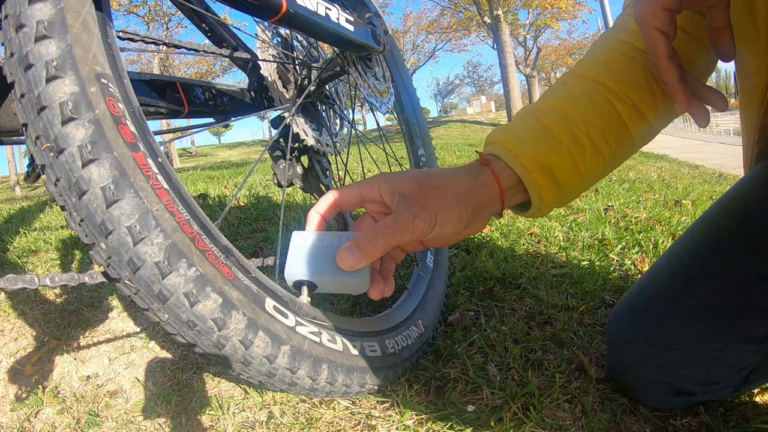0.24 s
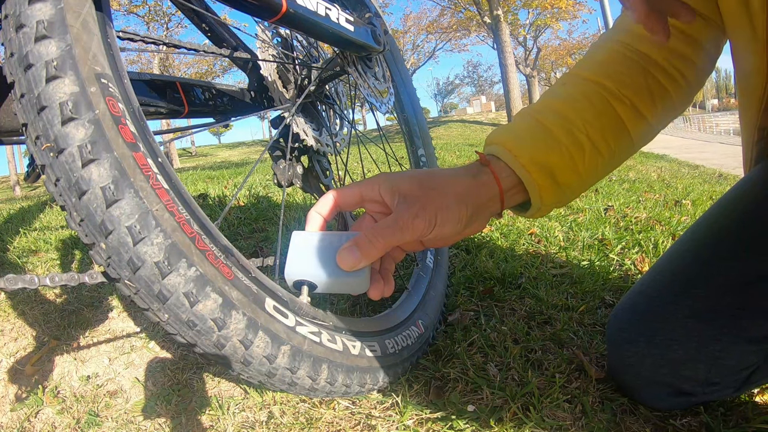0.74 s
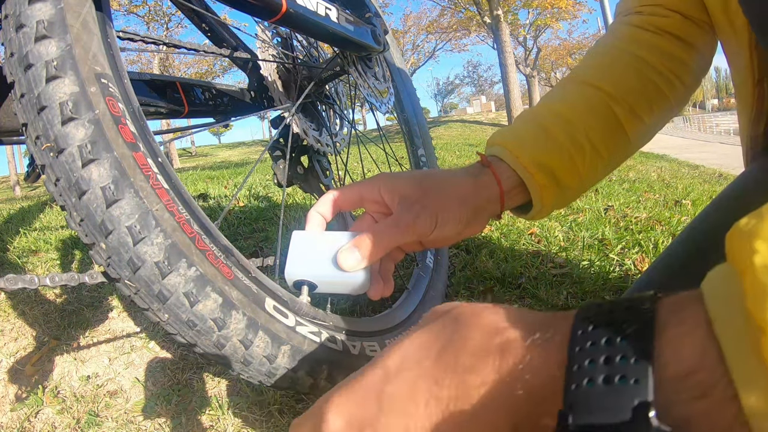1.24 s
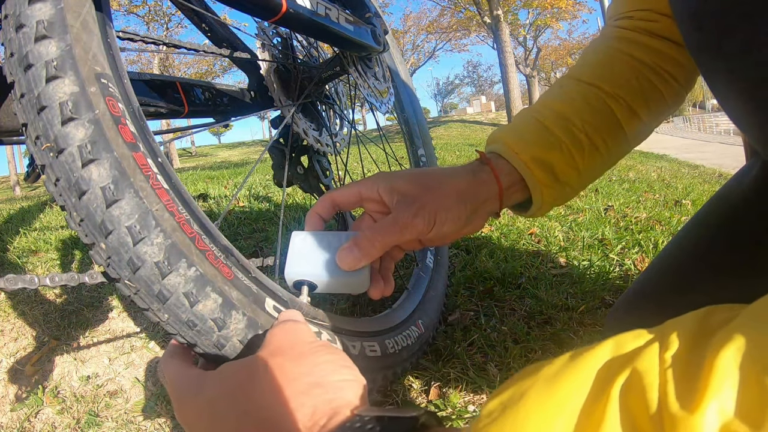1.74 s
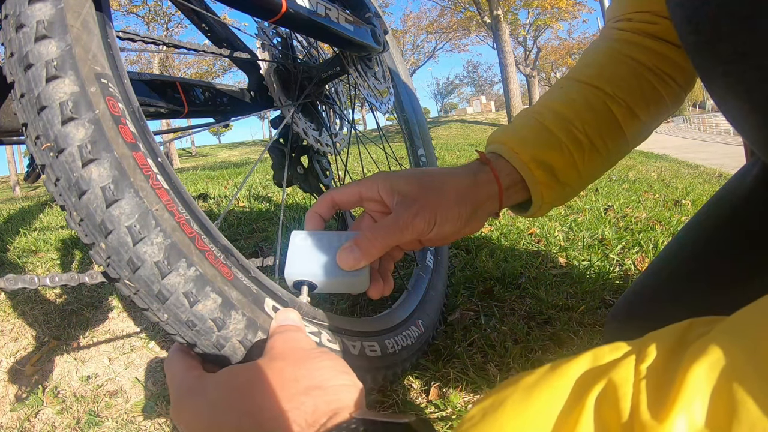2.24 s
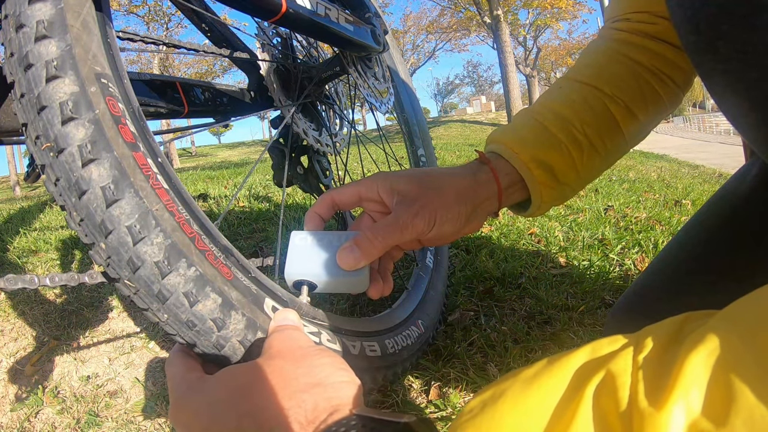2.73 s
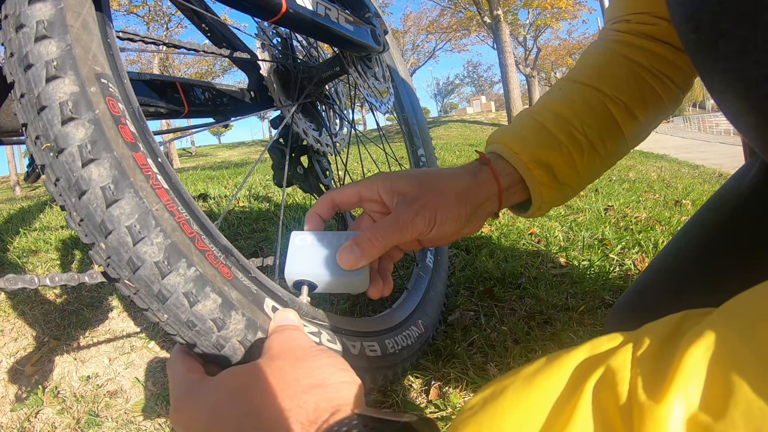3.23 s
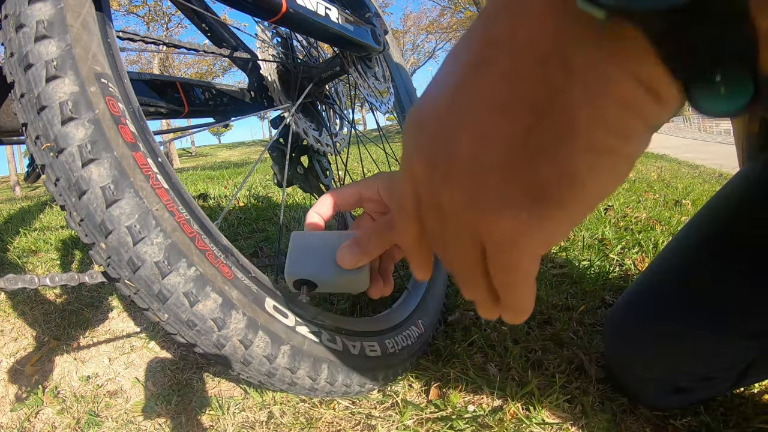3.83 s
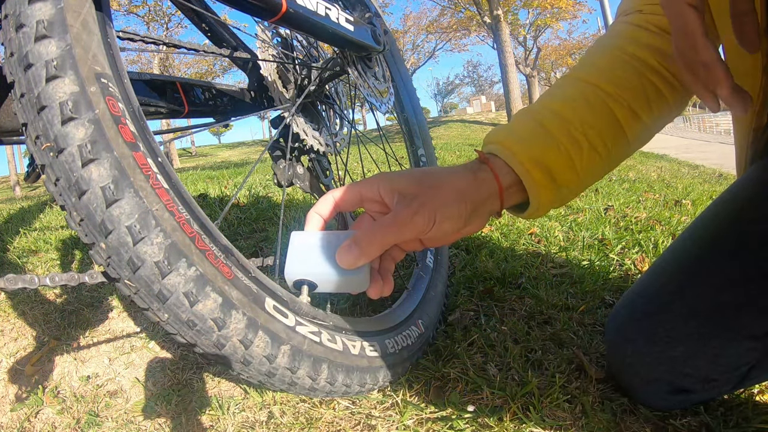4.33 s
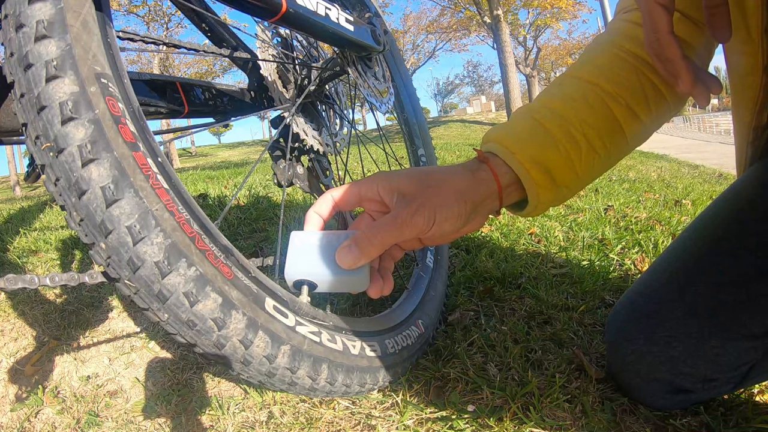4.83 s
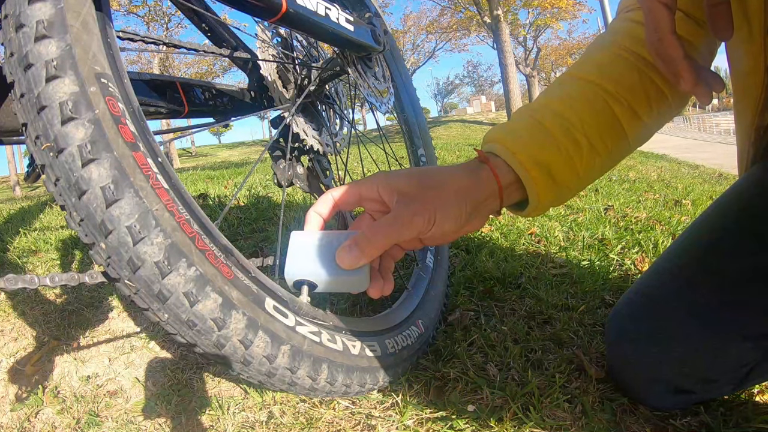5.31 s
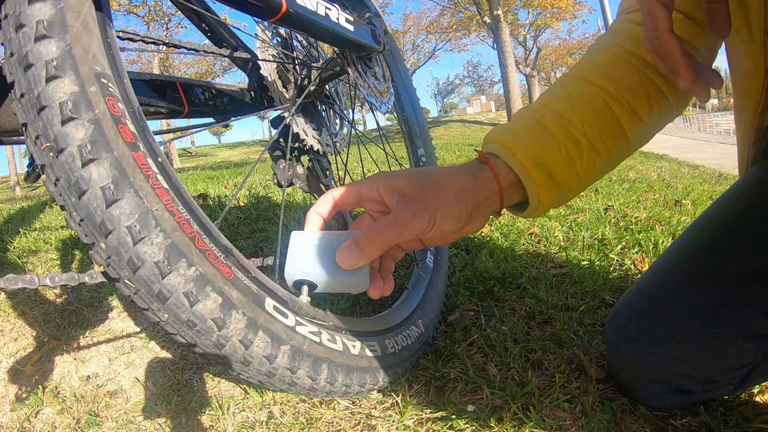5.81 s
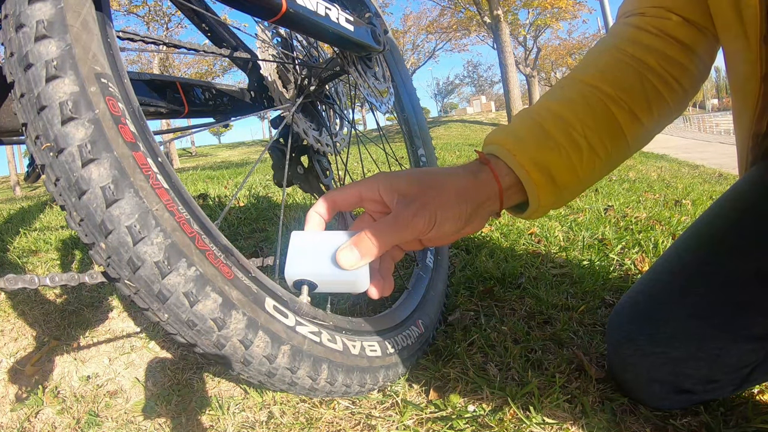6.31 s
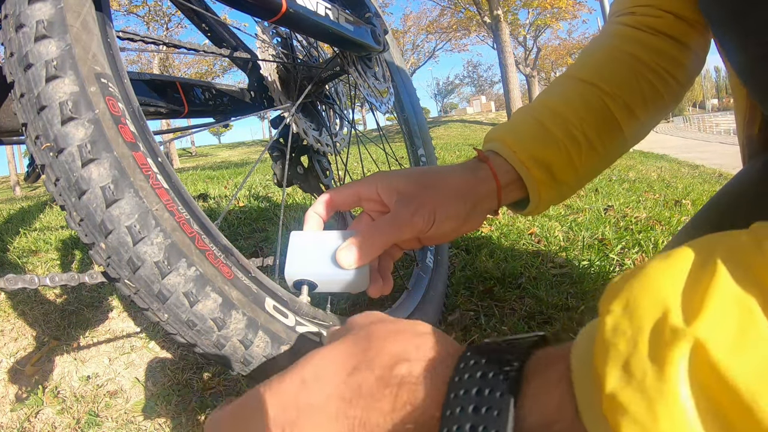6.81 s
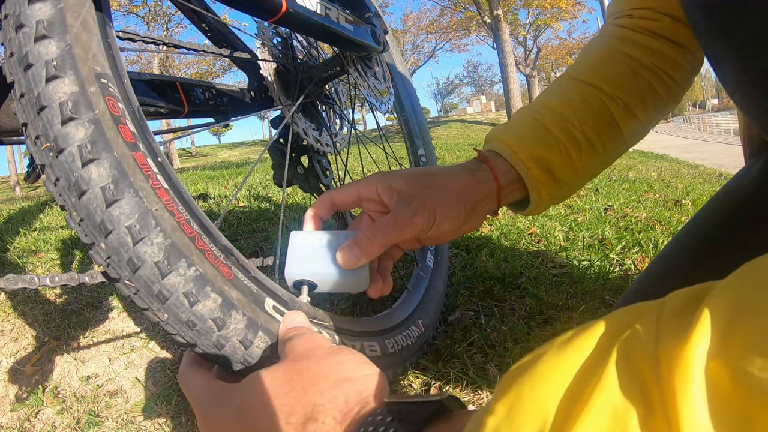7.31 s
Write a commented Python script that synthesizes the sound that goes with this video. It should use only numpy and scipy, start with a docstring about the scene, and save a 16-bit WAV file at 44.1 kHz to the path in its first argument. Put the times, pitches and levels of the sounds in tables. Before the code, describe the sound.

A pocket electric pump inflates a bicycle tyre on a lawn, running throughout with a low, pitched buzz, hard plastic rattle and breathy hiss. A nylon sleeve swishes briefly near the start, middle and late on. Soft wind thumps hit the nearby stereo microphone, more often in the second half, over faint distant traffic.

```python
"""A pump drones, buzzing and hissing, beside a small two-port camera on a lawn.
The pocket piston pump fills a bicycle tyre: each stroke adds multiples of the stroke rate (pressure),
knocks that ring the plastic casing (resonators) and a puff of hiss (shaped noise).
A nylon sleeve swishes by three times (filtered noise); wind rumbles (low noise) and thumps the ports
(short sine bursts); far traffic is a steady, broad low-to-mid wash (shaped noise)."""
import sys
import numpy as np
from scipy import signal
from scipy.fft import rfft, irfft, next_fast_len
from scipy.io import wavfile
from scipy.ndimage import uniform_filter1d

SR = 44100
rng = np.random.default_rng(int(sys.argv[2]) if len(sys.argv) > 2 else 0)


def master(y):
    """Save y as 16-bit WAV."""
    cut = np.clip(np.atleast_2d(y).T, -1, 1)
    pcm = np.round(cut * 32767)  # scale
    wavfile.write(sys.argv[1], SR, pcm.astype(np.int16))


N = 332953


def undb(db):
    """Amplitude gain of a dB value."""
    return 10 ** (np.asarray(db) / 20)


def unit(x):
    """Scale to rms 1."""
    return x / np.sqrt(np.mean(x ** 2))


def unit_mid(x):
    """Scale two ports so that their mean has rms 1."""
    return x / np.sqrt(np.mean(x.mean(axis=0) ** 2))


def seconds():
    """Time of each sample."""
    return np.arange(N) / SR


def curve(table):
    """Second column of a (time, value) table, interpolated to every sample."""
    time_s, value = np.transpose(table)
    return np.interp(seconds(), time_s, value)


def colour(x, points):
    """Filter by (frequency [Hz], gain [dB]) points, joined on a log-frequency axis."""
    size = next_fast_len(N)
    bin_hz = np.arange(size // 2 + 1) * SR / size + 1
    hz, db = np.transpose(points)
    gain = undb(np.interp(np.log(bin_hz), np.log(hz), db))
    return irfft(rfft(x, size) * gain, size)[..., :N]


def walk(rate_hz):
    """Random levels held 1 / rate_hz s, smoothed twice over that time; rms 1."""
    hold = int(SR / rate_hz)
    steps = np.repeat(rng.standard_normal(N // hold + 1), hold)
    return unit(uniform_filter1d(uniform_filter1d(steps, hold), hold)[:N])


def sides(pan_db):
    """Left and right gains, left minus right = pan_db, with mean 1."""
    left = undb(pan_db)
    return np.array([left, np.ones_like(left)]) * 2 / (1 + left)


def pair(shared):
    """Two white noises with a share of their power in common."""
    common, left, right = rng.standard_normal((3, N))
    return np.sqrt(shared) * common + np.sqrt(1 - shared) * np.array([left, right])


# speed wobbles: (rate [Hz], rate change [Hz/s], depth [Hz], first crest [cycles])
SPEED_WOBBLES = [(2.718, -.026, .33, .479), (4.209, .0257, .183, .229)]
STROKES_HZ, SAG_HZ_PER_S, SAG_EASES_HZ_PER_S2 = 120.24, .467, .02
SPEED_WANDER_HZ = 0.0706


def strokes():
    """Strokes done so far: the motor slows as the tyre fills, less and less, with wobbles and wander."""
    t = seconds()
    hz = STROKES_HZ - SAG_HZ_PER_S * t + SAG_EASES_HZ_PER_S2 * t ** 2
    hz = hz + SPEED_WANDER_HZ * walk(9.)
    for rate_hz, change, depth_hz, crest in SPEED_WOBBLES:
        hz = hz + depth_hz * np.cos(2 * np.pi * (rate_hz * t + change * t ** 2 / 2 - crest))
    return np.cumsum(hz) / SR + .6  # starts part way through a stroke


# pressure wave at the housing: (multiple of stroke rate [-], relative level [dB])
PRESSURE_MULTIPLES = [(1, 0.5), (2, -10), (3, -13), (4, -18), (5, -23.5), (6, -21), (7, -29.5), (8, -23),
                      (9, -25.5), (10, -25.5)]
# the drop takes time, so these swing the other way: (multiple [-])
FLIPPED_MULTIPLES = (5, 6, 7)
PRESSURE_RMS_DB, WAVER_DB_PER_LOG_MULTIPLE = -24, 0.99
DROP_RAD, LEAD_RAD = 1.683, 0.62  # lag per multiple; lead of multiples above 3
PRESSURE_PAN_DB, PAN_DB_PER_MULTIPLE = -2.5, -0.26


def pressure(turns):
    """Slow rise and quick drop of air pressure: phase-locked multiples, the upper ones wavering."""
    out = 0
    for k, db in PRESSURE_MULTIPLES:
        sign = -1 if k in FLIPPED_MULTIPLES else 1
        gain = sign * undb(db + WAVER_DB_PER_LOG_MULTIPLE * np.log(k) * walk(7.))
        phase = 2 * np.pi * k * turns - (k - 1) * DROP_RAD + LEAD_RAD * (k > 3)
        pan = sides(PRESSURE_PAN_DB + k * PAN_DB_PER_MULTIPLE)[:, None]
        out = out + gain * np.cos(phase) * pan
    return undb(PRESSURE_RMS_DB) * out / np.std(out.mean(axis=0))


def knock_train(turns, place, sign, scatter_ms, scatter_db, drift_ms):
    """One band-limited click a stroke, random in time and strength; its timing also drifts slowly."""
    stroke = np.arange(int(turns[-1]) + 1)
    late, strong = rng.standard_normal((2, len(stroke)))
    at = np.interp(stroke + place, turns, np.arange(N))
    shift_ms = late * scatter_ms + walk(12.)[at.astype(int)] * drift_ms
    pad = 32
    at = at + pad + shift_ms * SR / 1000
    taps = np.floor(at)[:, None] + np.arange(-7, 9)
    offset = taps - at[:, None]
    click = sign * np.sinc(offset) * np.cos(np.pi * offset / 17) ** 2  # windowed sinc: sub-sample timing
    click = click * undb(scatter_db * strong)[:, None]
    return np.bincount(taps.astype(int).ravel(), click.ravel(), N + 3 * pad)[pad:N + pad]


# casing modes: (centre [Hz], width of one resonator [Hz], left minus right [dB], left lag [ms])
CASING_MODES = [(1308, 212, -10.5, 0.12), (1464.6, 155, -3.5, -0.13), (1747, 160, -9.5, -0.06),
                (2050, 214, 0, -0.054), (2515, 325, -9.5, 0.021), (2780, 318, -11, 0.00051),
                (3122, 340, -8, -0.046), (3855, 394, -8, 0.0091), (4270, 500, -13, 0.046),
                (5084, 260, -6, 0.097), (5990, 420, -12.5, -0.04), (6580, 510, -16, 0.047),
                (8360, 1250, -46, 0.48), (10200, 1100, -51, .3), (13300, 2600, -30, .3)]
# casing tilt as pressure builds: (frequency [Hz], slope [dB/s])
CASING_DRIFT = [(1500, 0.13), (2700, 0.38), (3800, -0.1), (5800, -0.17), (10000, -1)]
# level swing of the modes around 4.3 kHz, before their share: (time [s], level [dB])
UPPER_LEVEL = [(0, 0), (1.3, 1), (1.5, 4), (1.85, 0), (3.6, -1), (3.8, 4.5), (4.15, 4.5), (4.35, 1.5),
               (4.7, -0.5), (5, 3.5), (6.75, 1.5), (6.95, 6), (7.55, 7)]
# share of that swing: {mode index: factor [-]}
UPPER_SHARE = {7: -.3, 8: 1}
SHIFT_DB_PER_OCTAVE, SHIFT_RATE_HZ = .35, 4.  # octaves above 1 kHz


def hold_db(mode):
    """Slow level of one mode: tilt as pressure builds, upper-mode swing, shifts of the hold."""
    hz = CASING_MODES[mode][0]
    drift_hz, drift_db_per_s = np.transpose(CASING_DRIFT)
    slope = np.interp(np.log(hz), np.log(drift_hz), drift_db_per_s)
    tilt = slope * (np.arange(N) - N / 2) / SR
    swing = UPPER_SHARE.get(mode, 0) * curve(UPPER_LEVEL)
    return tilt + swing + SHIFT_DB_PER_OCTAVE * np.log2(hz / 1000) * walk(SHIFT_RATE_HZ)


# knocks: (place [strokes], push or pull [sign], timing scatter [ms], size scatter [dB], timing drift [ms])
KNOCK_PLACES = [(.65, -1, .006, .9, .02), (.029, 1, .007, 1.2, .009), (.053, 1, .006, .9, .009),
                (.288, -1, .01, 1.4, .022)]
# one row a knock: (relative level into each casing mode [dB], ...)
KNOCK_LEVELS = [
    [-2.5, -39, 0, -11.5, -6, -42, -7.5, -47, -25, -16, -30, -41, -28, -48, -50],
    [-39, -58, -59, -31, -40, -36, -3, -2.5, -49, -24, -15.5, -13, -9, -24, -44],
    [-11, -44, -8.5, -6, 4, 0.5, -34, -3, -6.5, -11.5, -14.5, -47, -19.5, -33, -49],
    [-19, -6.5, -36, -15, -3, -38, -13.5, -48, -9, -15, -23, -42, -13, -26, -43],
]
CASING_RMS_DB, MODE_WAVER_DB, MODE_WAVER_RATE_HZ = -29.5, 1.25, 16.


def casing(turns):
    """Valve and crank knocks ring fixed modes; each mode's level wavers, slightly differently at each port."""
    size = next_fast_len(N + 4096)
    hz = np.arange(size // 2 + 1) * SR / size + 1
    trains = [rfft(knock_train(turns, *row), size) for row in KNOCK_PLACES]
    out = 0
    for m, (centre_hz, width_hz, pan_db, lag_ms) in enumerate(CASING_MODES):
        detune = (hz / centre_hz - centre_hz / hz) * centre_hz / width_hz
        ring = 1 / (1 + 1j * detune) ** 2  # coupled pair: soft onset, steep skirts
        drive = sum(undb(levels[m]) * train for levels, train in zip(KNOCK_LEVELS, trains))
        left = undb(pan_db) * np.exp(-2j * np.pi * hz * lag_ms / 1000)
        ports = np.array([left, np.ones_like(hz)])
        ringing = irfft(ring * drive / width_hz * ports, size)[:, :N]
        each_port = np.array([walk(MODE_WAVER_RATE_HZ), walk(MODE_WAVER_RATE_HZ)])
        waver = MODE_WAVER_DB * (walk(MODE_WAVER_RATE_HZ) + 0.25 * each_port)
        out = out + undb(hold_db(m) + waver) * ringing
    return undb(CASING_RMS_DB) * unit_mid(out)


# air past the valve: (frequency [Hz], relative density [dB])
AIR_TONE = [(700, -32), (1300, -32), (2500, -5), (4000, -10), (5500, -15), (7300, -18.5), (8500, -19.5),
            (11000, -28.5), (14000, -51)]
# air, left minus right: (frequency [Hz], level [dB])
AIR_PAN_TONE = [(60, -3.0), (110, -2.0), (200, -3.0), (370, -3.0), (670, -4.5), (1230, -6.5), (2250, -8.0),
                (4110, -9.0), (7510, -15.0), (13700, -21.5)]
AIR_RMS_DB, AIR_STEADY, AIR_SHARED = -41.5, 0.43, 1  # rms before left-port colouring; leak per unit puff
AIR_START_STROKES, AIR_FADE_STROKES = 0.024, 0.82


def air(turns):
    """Air rushing past the valve: a decaying puff of hiss once a stroke over a leak; the flow flutters."""
    since_start = (turns - AIR_START_STROKES) % 1
    puff = AIR_STEADY + np.exp(-since_start / AIR_FADE_STROKES)
    flutter = undb(2.0 * walk(14.))
    left, right = unit(colour(flutter * puff * pair(AIR_SHARED), AIR_TONE))
    return undb(AIR_RMS_DB) * np.array([colour(left, AIR_PAN_TONE), right])


# sleeve brushes: (start [s], rise [s], hold [s], fall [s], level [dB])
SLEEVE_BRUSHES = [(0.775, 0.11, 0.16, 0.14, -38), (3.88, 0.076, 0.037, .06, -40),
                  (6.262, 0.063, 0.21, .045, -38.5)]
# cloth noise: (frequency [Hz], relative density [dB])
SLEEVE_TONE = [(500, -8), (2000, 4.5), (4000, -4), (6500, -5.5), (8300, -1), (10000, -12), (13000, -22),
               (15000, -44)]
SLEEVE_PAN_DB, SCRATCH_DB = -19.5, 1.2


def sleeve():
    """Nylon rubbing on nylon: dense, roughened noise that rises, holds and stops."""
    cloth = unit(colour(pair(.4) * undb(SCRATCH_DB * walk(150.)), SLEEVE_TONE))
    rub = 0
    for start, rise, hold, fall, db in SLEEVE_BRUSHES:
        corners = np.cumsum([start, rise, hold, fall])
        rub = rub + undb(db) * np.interp(seconds(), corners, [0, 1, 1, 0])
    return rub * undb(SCRATCH_DB * walk(60.)) * sides(SLEEVE_PAN_DB)[:, None] * cloth


# breeze on the ports, before flutter: (time [s], level [dB])
BREEZE_LEVEL = [(0.0, -50), (2.14, -48), (2.59, -42), (2.98, -44), (5.76, -47), (5.99, -46), (7.13, -48),
                (7.55, -52)]
# breeze noise: (frequency [Hz], relative density [dB])
BREEZE_COLOUR = [(15, -25), (32, -5), (55, 2.5), (85, 3.5), (160, -12.5), (250, -20), (400, -38),
                 (800, -75)]
# gusts: (peak time [s], full width at 1/e [s], level [dB], left minus right [dB])
GUST_EVENTS = [(1.33, .14, -45, -8), (2.06, .12, -44, -6), (2.46, .25, -39, -3), (2.612, .09, -30, 2),
               (2.73, .08, -39, -9), (3.0, .06, -41, -14), (3.48, .07, -31, -19), (3.59, .07, -40, -7),
               (3.896, .12, -38, -13), (4.137, .07, -31, -13), (4.21, 0.074, -37, -20),
               (4.56, .07, -42, -15), (4.69, .07, -40, -16), (5.12, .25, -46, -12), (5.45, 0.08, -39, -21),
               (5.904, .12, -30.5, -18), (6.1, .14, -35, -16), (6.262, .09, -36, -9), (6.4, .08, -27, -1),
               (6.62, 0.053, -32, -23), (6.87, .12, -40, -6), (6.96, .06, -35, -14),
               (7.124, 0.066, -34, -23), (7.23, .14, -43, -20)]
# gust noise: (frequency [Hz], relative density [dB])
GUST_COLOUR = [(15, -10), (32, 3), (55, 3), (85, 4), (160, -8.5), (250, -24.5), (400, -40), (800, -73)]
WIND_SHARED, FLUTTER_DB, FLUTTER_RATE_HZ = .6, 4, 14.
BREEZE_PAN_DB, PAN_SWING_DB = -5, 2


def wind():
    """Turbulence at the ports, partly alike left and right: a fluttering breeze and short, deeper gusts."""
    t, air_flow = seconds(), pair(WIND_SHARED)
    breeze = undb(curve(BREEZE_LEVEL) + FLUTTER_DB * walk(FLUTTER_RATE_HZ))
    breeze = breeze * sides(BREEZE_PAN_DB + PAN_SWING_DB * walk(8.))
    gusts = 0
    for peak_s, width_s, db, pan_db in GUST_EVENTS:
        swell = np.exp(-(2 * (t - peak_s) / width_s) ** 2)
        gusts = gusts + undb(db) * sides(pan_db)[:, None] * swell
    return breeze * unit(colour(air_flow, BREEZE_COLOUR)) + gusts * unit(colour(air_flow, GUST_COLOUR))


# wind puffs on a port: (centre time [s], level [dB], pitch [Hz], left minus right [dB])
PORT_THUMPS = [(2.611, -17, 45, -1), (3.48, -27, 70, -15), (4.136, -22, 75.8, -15), (4.688, -26, 72, -16),
               (5.902, -25, 110, -18), (6.121, -32, 79.5, -13), (6.41, -17, 149, -16),
               (6.622, -21, 80, -17), (6.962, -26, 130, -15), (7.13, -26, 80, -20)]


def thumps():
    """Each puff presses the diaphragm for a cycle or two: a sine under a Gaussian."""
    t, out = seconds(), np.zeros((2, N))
    for centre_s, db, hz, pan_db in PORT_THUMPS:
        near = slice(int((centre_s - .1) * SR), int((centre_s + .1) * SR))
        cycles = (t[near] - centre_s) * hz
        push = np.exp(-(cycles / .5) ** 2) * np.sin(2 * np.pi * cycles)
        out[:, near] += undb(db) * sides(pan_db)[:, None] * push
    return out


# distant traffic: (frequency [Hz], relative density [dB])
TRAFFIC_TONE = [(100, 1.5), (300, -10), (600, -11.5), (1000, -10), (2000, -5.5), (5000, -67)]
TRAFFIC_RMS_DB = -45.5


def traffic():
    """Distant traffic as a steady, broad low-to-mid wash of shaped noise."""
    return undb(TRAFFIC_RMS_DB) * unit(colour(pair(0.19), TRAFFIC_TONE))


def scene():
    """Pump, sleeve, wind and far traffic at the two ports."""
    turns = strokes()
    pump = pressure(turns) + casing(turns) + air(turns)
    return pump + sleeve() + wind() + thumps() + traffic()


TOP_HZ = 14200


def record(dry):
    """The camera cuts the top: a steep elliptic low-pass."""
    return signal.sosfilt(signal.ellip(8, .2, 70, TOP_HZ, fs=SR, output="sos"), dry)


dry = scene()
out = record(dry)
master(out)
```